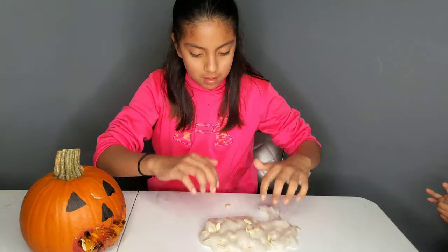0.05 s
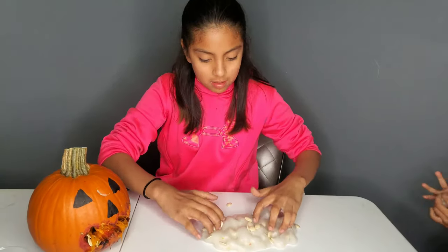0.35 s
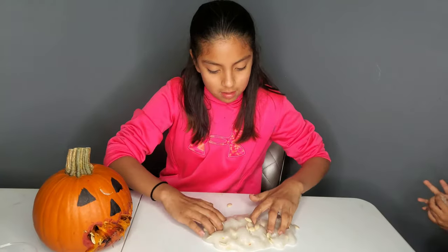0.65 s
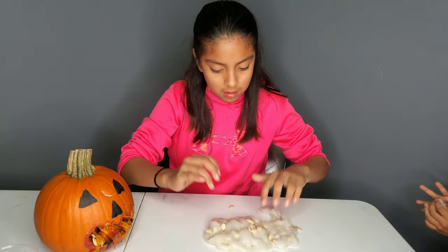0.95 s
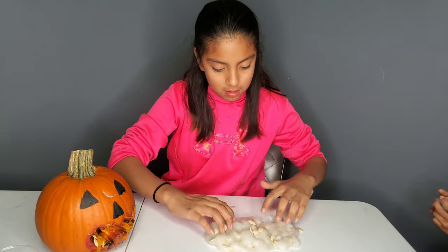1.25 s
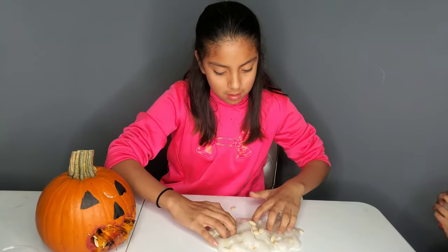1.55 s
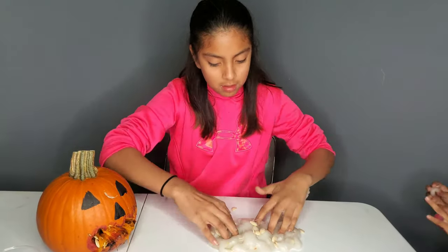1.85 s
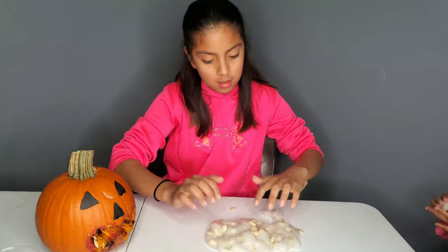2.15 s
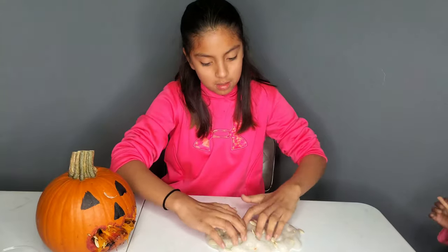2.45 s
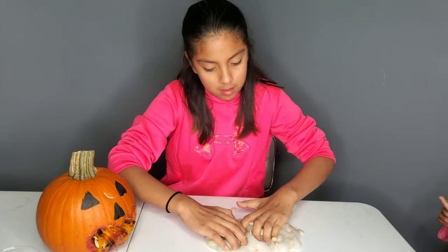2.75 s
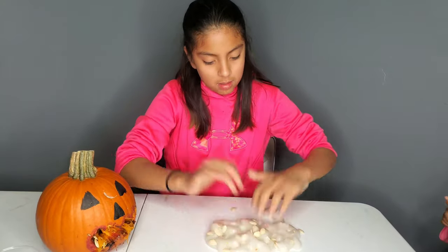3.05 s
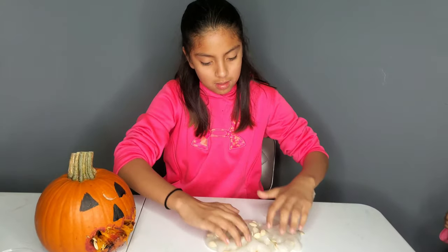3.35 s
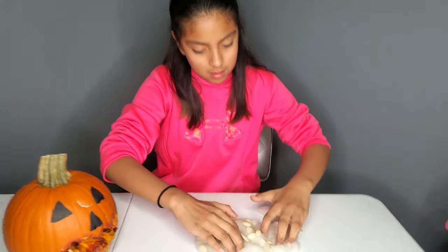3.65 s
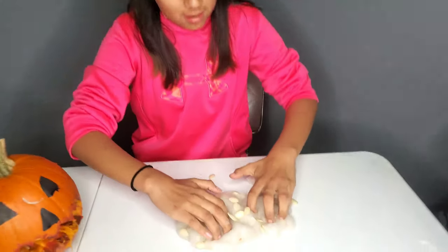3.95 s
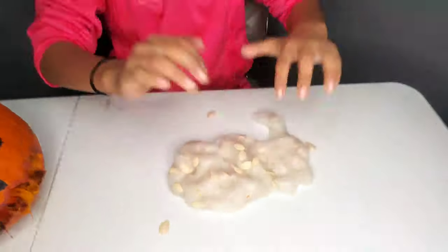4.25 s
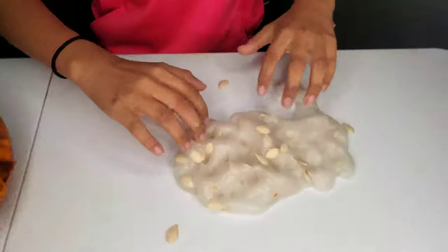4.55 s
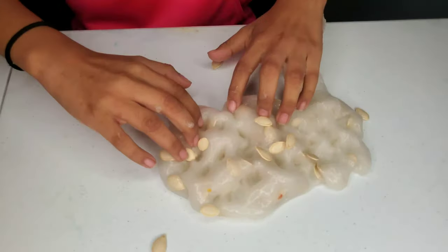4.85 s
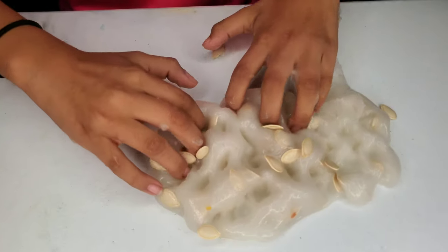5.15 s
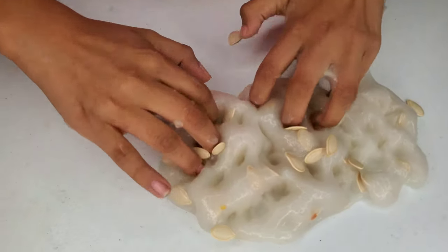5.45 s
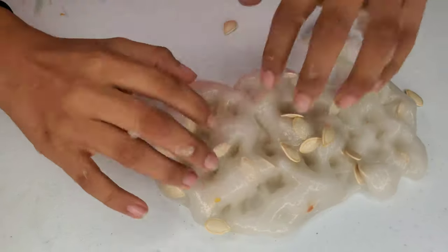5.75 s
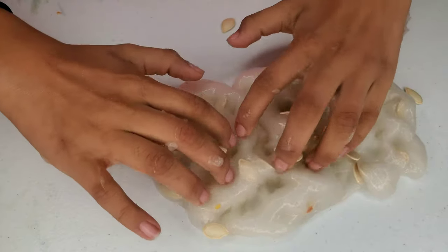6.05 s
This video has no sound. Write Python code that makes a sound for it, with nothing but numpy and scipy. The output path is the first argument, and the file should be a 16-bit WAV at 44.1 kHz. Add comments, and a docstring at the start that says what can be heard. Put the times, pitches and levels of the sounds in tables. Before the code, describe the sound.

Wet slime crackles and squelches in irregular bursts as fingers press it against a light table indoors. Small air bubbles snap, a couple of tiny squeaks slip out, and dull, hollow thumps come from the tabletop over a faint room hush. In the last third the microphone is nearer and everything is louder, with the hardest presses rattling a small piece of metal. A sharp pop comes just before the kneading dies away.

```python
"""Two hands knead sticky slime full of pumpkin seeds on a light folding table, in a small bare room.
Over the room's hush, resting fingers keep up a faint rumble and crackle. Trapped air pops, fingertips
sink through to the table, and the slime squelches and gulps as they peel out. Flat hands thump the top
and air squeaks twice through a pinhole. Late on the microphone leans in, drying the sound, and the
hardest presses set something small and metallic jingling; after a last loud pop the kneading fades."""
import sys
import numpy as np
from scipy import signal
from scipy.fft import rfft, irfft, next_fast_len
from scipy.io import wavfile

SR = 44100
rng = np.random.default_rng(int(sys.argv[2]) if len(sys.argv) > 2 else 0)


def dump(signal):
    """Clip the signal to [-1, 1] and save it as 16-bit WAV at the path in sys.argv[1]."""
    limited = np.clip(np.atleast_2d(signal).T, -1, 1)
    pcm = np.round(limited * 32767).astype(np.int16)
    wavfile.write(sys.argv[1], SR, pcm)


N = 272979

# Room air, kneading, pops, fingertip presses, squelches and thumps also have an overall level.
# spectrum of the still room air: (frequency [Hz], level [dB])
ROOM_TONE = [(25, -1), (60, 3), (130, -3.5), (260, -6), (420, -31.5), (800, -26), (1500, -24),
             (2600, -44.5), (10000, -40), (16000, -36)]
# quiet kneading between the big moves: (time [s], rumble level [dB], crackle level [dB])
KNEADING_BED = [(0.0, -70.5, -59.5), (0.26, -44, -59), (0.4, -41.5, -49), (1.02, -60.5, -53),
                (1.24, -63, -60), (1.52, -62, -72.5), (1.96, -36.5, -41.5), (2.26, -66, -72.5),
                (2.64, -64, -87), (2.93, -50, -62.5), (3.34, -69, -81.5), (3.84, -44, -65),
                (4.07, -41.5, -48.5), (4.36, -44.5, -45), (5.05, -46, -57.5), (5.46, -42, -56.5),
                (5.84, -49.5, -72), (6.19, -70, -79.5)]
# modes of the table top: (frequency [Hz], level [dB], t60 [s])
TABLE_MODES = [(70.2, -2.5, 0.34), (102.2, -1, 0.31), (156.3, -4.5, 0.23), (207.6, -3.5, 0.17),
               (270, -4.5, 0.27), (316.2, -8.5, 0.26), (377, -7, 0.21), (466.5, 2, 0.048),
               (527.4, -10.5, 0.2), (572, -17.5, 0.25), (642.5, -16, 0.25), (833, -6.5, 0.069),
               (950, -14.5, 0.22), (1180, -15.5, 0.14)]
# single air pockets bursting: (time [s], level [dB], brightness [dB])
AIR_POPS = [(0.1084, -50, 11), (0.2231, -58, 13.5), (0.5782, -40, -7), (0.749, -52, -1), (0.788, -40, -5.5),
            (0.8708, -53, -7), (0.8994, -36.5, -3.5), (0.9274, -35, -2), (1.5032, -64, 19.5),
            (1.6495, -51, 0.5), (1.7134, -40, -5), (1.767, -40.5, -7), (1.9248, -39, -4), (1.9576, -41, 10),
            (1.9802, -29, -0.5), (2.8408, -50.5, -6), (2.9391, -43.5, -2.5), (3.0098, -32.5, -1.5),
            (3.0226, -21, -0.5), (3.8435, -41.5, -8), (3.9215, -37, -7), (4.1772, -43.5, 11),
            (4.181, -26, 1), (4.2001, -24, -4.5), (4.065, -37, 0), (4.383, -36.5, -1), (4.7806, -45, -13),
            (5.1, -50.5, 5), (5.1626, -45, 3), (5.192, -38.5, -6), (5.288, -35.5, -12.5), (5.3497, -32, 2),
            (5.4176, -55, 10), (5.522, -44.5, 6.5), (5.5284, -39, 2), (5.572, -30, 7), (5.5783, -29.5, 1.5),
            (5.5813, -16.5, 3.5), (5.5916, -30, -2)]
# edges of the slime's three bands: (bottom [Hz], low split [Hz], high split [Hz], top [Hz])
SLIME_EDGES = [600, 1900, 4400, 15000]
# EQ of an ordinary pop in those bands: (low [dB], middle [dB], high [dB])
POP_EQ = [0, -7.5, 0]
# fingertips sinking through the slime onto the table: (time [s], hollow note [Hz], level [dB])
FINGERTIP_PRESSES = [(0.226, 211, -39.5), (0.369, 179, -30), (0.465, 224, -34), (0.488, 197, -32),
                     (0.62, 183, -41), (1.04, 238, -34.5), (1.768, 207, -42), (1.961, 200, -37.5),
                     (2.03, 294, -42), (2.731, 188, -42.5), (2.8397, 311, -43), (3.326, 301, -41),
                     (3.368, 190, -37.5), (3.512, 185, -46), (4.227, 184, -29), (4.333, 372, -32.5),
                     (4.385, 232, -33), (4.811, 227, -23), (4.861, 262, -29.5), (5.19, 310, -28)]
# edges of the table's three bands: (bottom [Hz], low split [Hz], high split [Hz], top [Hz])
TABLE_EDGES = [30, 130, 380, 1200]
# EQ of a fingertip in those bands: (push [dB], body [dB], knock [dB])
DIMPLE_EQ = [-12.5, 0, -12]
# fingers sinking in or peeling off: (time [s], length [s], level [dB], brightness [dB])
FINGER_STROKES = [(0.231, 0.065, -53, -8.5), (0.455, .04, -50, -1), (0.577, 0.072, -45.5, 0),
                  (0.783, 0.055, -55.5, -1), (0.905, 0.083, -39, -3.5), (1.092, 0.034, -50.5, -1.5),
                  (1.67, 0.063, -52, 0), (1.942, 0.033, -45, -8.5), (2.085, 0.054, -48.5, 4),
                  (2.633, 0.047, -63.5, 3), (2.714, 0.042, -52.5, 1), (2.943, 0.057, -54, -5),
                  (3.005, 0.031, -32.5, 5.5), (3.59, 0.034, -66, 1.5), (3.89, 0.098, -49, 3.5),
                  (4.063, 0.054, -37.5, -1), (4.175, .033, -34, -3.5), (4.372, 0.055, -36, -0.5),
                  (4.527, 0.039, -31, -6.5), (4.783, .023, -37.5, -10.5), (5.169, 0.1, -50, -0.5),
                  (5.287, 0.061, -48, -6.5), (5.521, 0.052, -41, -3.5), (5.585, 0.0074, -25.5, -3)]
# EQ of an ordinary squelch in the slime's bands: (low [dB], middle [dB], high [dB])
SQUELCH_EQ = [0, 1, 0]
# hollows gulping open as fingers pull out: (time [s], pitch [Hz], level [dB])
OPENING_HOLLOWS = [(.579, 764, -29), (.926, 2944, -27.5), (.949, 1258, -22.5), (1.957, 1343, -22.5),
                   (1.958, 2642, -21.5), (3.024, 1063, -21), (4.199, 1185, -26), (4.383, 3120, -19.5),
                   (4.779, 3200, -24.5), (5.286, 2993, -23.5), (5.349, 1064, -20.5), (5.592, 999, -12.5)]
# flat hands landing on the table: (time [s], level [dB], hardness [dB])
HAND_LANDINGS = [(0.79, -45, -2), (0.865, -43, -2.5), (0.93, -34, 0), (0.97, -40, 4), (2.976, -45, 1.5),
                 (3.029, -32, 2.5), (3.778, -43, -4.5), (3.845, -37.5, 7.5), (4.132, -39, -0.5),
                 (4.186, -29, -4), (4.272, -24.5, 4.5), (4.299, -28.5, 4.5), (4.53, -16.5, 2),
                 (4.601, -29, -2), (5.286, -16.5, -1), (5.32, -26, -5.5), (5.353, -31, -1.5),
                 (5.496, -36, -4.5), (5.563, -32.5, -6), (5.611, -28.5, -10)]
# EQ of an ordinary thump in the table's bands: (push [dB], body [dB], knock [dB])
THUMP_EQ = [-4.5, 0, -4]
# air squeaking out through a pinhole: (time [s], length [s], level [dB])
AIR_JETS = [(0.896, 0.027, -47), (1.782, 0.083, -51)]
# resonances of the pinhole: (frequency [Hz], width [Hz], level [dB])
PINHOLE_PEAKS = [(6340, 100, -0.5), (8190, 66, 6), (8970, 210, -14.5), (9440, 260, 0), (9400, 360, -18)]
# loose metal chattering: (time [s], length [s], level [dB])
METAL_RATTLES = [(4.537, 0.054, -35), (4.868, 0.018, -51), (5.317, 0.078, -57)]
# modes of the loose metal: (frequency [Hz], level [dB], nominal t60 [s])
METAL_MODES = [(3770, -10, 0.2), (4800, 6, 0.17), (4786, -16.5, .3), (5540, -18, .24), (5680, -1.5, 0.4),
               (7230, -3, .2), (8170, -8, .2), (8840, 2.5, 0.059), (9500, 2.5, 0.21), (10700, -7.5, 0.21),
               (12500, 0, .2), (13830, -9.5, 0.24)]
# trim on the metal's ring, a touch shorter up high: (frequency [Hz], t60 scale [ratio])
METAL_DECAY_TRIM = [(4500, 0.97), (11000, .95)]
# decay of the room: (frequency [Hz], t60 [s])
ROOM_DECAY = [(100, 0.27), (500, 0.38), (1400, 0.28), (4000, 0.27), (9000, 0.21), (15000, 0.2)]
# the microphone leans in over the table: (time [s], reverb send offset [dB])
LEAN_IN = [(3.7, 2.5), (5, -4)]
# colour of the microphone: (frequency [Hz], gain [dB])
MIC_EQ = [(25, 3), (60, 4), (1100, -2.5), (1900, -4), (3500, -0.5), (7000, -0.5), (10000, -0.5),
          (12500, -6.5), (15000, -9)]


def amp(db):
    """Decibels to gain."""
    return 10 ** (np.asarray(db) / 20)


def rms(x):
    """Average signal level, as root mean square."""
    return np.sqrt(np.mean(x ** 2) + 1e-20)


def along(points, hz):
    """Read a (frequency, value) curve on a log frequency axis."""
    freqs, values = np.transpose(points)
    return np.interp(np.log(hz + 1), np.log(freqs), values)


def clock():
    """Time axis of one event, half a second long."""
    return np.arange(SR // 2) / SR


def add(track, s, sound):
    """Mix a sound into the track at time s."""
    part = track[max(round(s * SR), 0):][:len(sound)]
    part += sound[:len(part)]


def filtered(x, response):
    """Shape a sound with a gain curve over frequency."""
    size = next_fast_len(len(x) + SR // 4)
    return irfft(rfft(x, size) * response(np.fft.rfftfreq(size, 1 / SR)), size)[:len(x)]


def band(x, lo, hi, order=3):
    """Band-pass from lo to hi, in Hz."""
    sections = signal.butter(order, [lo, min(hi, SR / 2 - 100)], 'band', fs=SR, output='sos')
    return signal.sosfilt(sections, x)


def toned(x, edges, levels_db, window_s, order=3):
    """Multiband EQ: each band is set to its level over the opening window."""
    parts = [band(x, lo, hi, order=order) for lo, hi in zip(edges, edges[1:])]
    return sum(amp(db) * part / rms(part[:int(window_s * SR)]) for part, db in zip(parts, levels_db))


def tilted(eq, level_db, slope_db):
    """Three-band tilt: a bright or hard event lifts the top and lowers the bottom alike."""
    return level_db + np.array(eq) + slope_db * np.array([-1, 0, 1])


def in_room(x, wet_db):
    """The direct sound, slaps off a few near walls, then a diffuse tail."""
    hz, t, spectrum = signal.stft(rng.standard_normal(SR // 2), SR, nperseg=256)
    decay = amp(-60 * t / along(ROOM_DECAY, hz)[:, None])
    tail = signal.istft(spectrum * decay, SR, nperseg=256)[1][:SR // 2]
    tail *= np.clip((clock() - .002) / .006, 0, 1)
    slaps = (rng.uniform(.003, .025, 7) * SR).astype(int)
    tail[slaps] += 3.55 * rng.standard_normal(7)
    impulse = amp(wet_db) * tail / np.linalg.norm(tail)
    impulse[0] += 1  # direct sound
    return signal.fftconvolve(x, impulse)[:len(x)]


def room_share(s):
    """Reverb send offset in dB: the nearer the microphone, the less room it hears."""
    return np.interp(s, *np.transpose(LEAN_IN))


def air(level_db):
    """The low hush of still air in the room."""
    hush = filtered(rng.standard_normal(N), lambda hz: amp(along(ROOM_TONE, hz)))
    return amp(level_db) * hush / rms(hush)


def bubbles(times, sizes, samples, pitch_hz, spread, cycles):
    """Tiny cavities tear open; the slime damps each within about one cycle."""
    t = np.arange(SR // 300) / SR
    hz = np.clip(pitch_hz * np.exp(spread * rng.standard_normal((len(times), 1))), 600, 14000)
    turns = hz * t
    grains = np.sin(2 * np.pi * turns) * np.exp(-turns / cycles) * (hz / pitch_hz) ** .5
    grains *= rng.choice([-1, 1], (len(times), 1))
    positions = (times * SR).astype(int)[:, None] + np.arange(len(t))
    return np.bincount(positions.ravel(), (sizes[:, None] * grains).ravel(), samples)[:samples]


def kneading(rumble_db, crackle_db, bubbles_per_s, size_spread_db):
    """Resting fingers keep the table rumbling and the slime rustling faintly."""
    cues, *faders = np.transpose(KNEADING_BED)
    rumble_fader, crackle_fader = [np.interp(np.arange(N) / SR, cues, fader) for fader in faders]
    table_top = ring(TABLE_MODES, scatter_db=0)
    rumble = band(signal.fftconvolve(rng.standard_normal(N), table_top)[:N], 150, 740, order=2)
    count = int(bubbles_per_s * N / SR)
    sizes = amp(size_spread_db * np.minimum(rng.exponential(size=count), 3))
    times = rng.uniform(0, N / SR, count)
    crackle = bubbles(times, sizes, N, pitch_hz=4455, spread=1.0, cycles=0.47)
    crackle = band(in_room(crackle, wet_db=-4.0), 520, 8100)
    return (amp(rumble_fader + rumble_db) * rumble / rms(rumble)
            + amp(crackle_fader + crackle_db) * crackle / rms(crackle))


def ring(modes, scatter_db):
    """One blow on a set of modes; random scatter in their strengths stands for where it lands."""
    t = clock()
    return sum(rng.choice([-1, 1]) * amp(db + scatter_db * rng.normal() - 60 * t / t60)
               * np.sin(2 * np.pi * hz * t) for hz, db, t60 in modes)


def pops(level_db, wet_db, tear_s, crack_db):
    """A film of slime cracks at once, then tears open over an air pocket."""
    out, t = np.zeros(N), clock()
    for s, db, brightness in AIR_POPS:
        crack = amp(crack_db) * np.exp(-t / 0.00019)
        tear = np.exp(-t / tear_s) * (1 - np.exp(-t / 0.00095))
        snap = rng.standard_normal(len(t)) * (crack + tear)
        pocket = np.sin(2 * np.pi * rng.uniform(885, 1400) * t) * np.exp(-t / 0.0015)
        levels = tilted(POP_EQ, db, brightness)
        pop = toned(snap + 0.23 * pocket, SLIME_EDGES, levels, window_s=0.0037, order=5)
        add(out, s, in_room(pop, wet_db + room_share(s)))
    return amp(level_db) * out


def dimples(level_db, wet_db, note_gain, note_t60, rise_s):
    """A fingertip sounds one round, hollow note over the table's modes; each spot has its own note."""
    out, t = np.zeros(N), clock()
    for s, note_hz, db in FINGERTIP_PRESSES:
        note = np.sin(2 * np.pi * note_hz * t) * amp(-60 * t / note_t60) * (1 - np.exp(-t / rise_s))
        blow = table_blow(push=9.9, pat_s=0.018) + note_gain * note
        add(out, s, landing(s, blow, db + np.array(DIMPLE_EQ), wet_db))
    return amp(level_db) * out


def table_blow(push, pat_s, contact_s=.003, pat_db=22.5):
    """A soft hand shoves the table top, pats it with skin and sets its modes ringing."""
    t = clock()
    shove = push * (1 - t / contact_s) * np.exp(-t / contact_s)
    pat = band(rng.standard_normal(len(t)), 77, 900, order=2) * np.exp(-t / pat_s)
    return ring(TABLE_MODES, scatter_db=2.5) + shove + amp(pat_db) * pat


def landing(s, blow, levels, wet_db):
    """A thud in the room, layered with the squish of slime under it, whose level rides the knock."""
    thud = in_room(toned(blow, TABLE_EDGES, levels, window_s=0.029), wet_db + room_share(s))
    knock_db = levels[-1]
    squish = stroke(length_s=.04, db=knock_db - 21.5, brightness=-2, wet_db=room_share(s))
    return thud + squish


def stroke(length_s, db, brightness, wet_db, tears_per_s=650, size_spread_db=5,
           strand_delay_s=.06, strand_db=-9.5):
    """A moving finger tears a swell of tiny bubbles; thin strands snap after it, ever smaller."""
    count = int(tears_per_s * length_s) + 4
    progress = (np.arange(count) + rng.random(count)) / count
    swell = .5 + np.sin(np.pi * progress)
    tears = amp(size_spread_db * np.minimum(rng.exponential(size=count), 3)) * swell
    lateness = rng.exponential(size=count)
    strands = tears * amp(strand_db) * np.exp(-lateness)
    times = np.r_[progress * length_s, length_s + strand_delay_s * lateness]
    crackle = bubbles(times, np.r_[tears, strands], SR // 2, pitch_hz=3100, spread=0.76, cycles=0.73)
    levels = tilted(SQUELCH_EQ, db, brightness)
    return toned(in_room(crackle, wet_db), SLIME_EDGES, levels, window_s=length_s + 0.0031)


def squelches(level_db, wet_db):
    """One sticky stroke each time the fingers sink in or peel off."""
    out = np.zeros(N)
    for s, length_s, db, brightness in FINGER_STROKES:
        add(out, s, stroke(length_s, db, brightness, wet_db + room_share(s)))
    return amp(level_db) * out


def gulps(wet_db, decay_s, glide, flutter):
    """A finger-sized hollow rings; its pitch rises as the mouth widens and its soft rim flutters."""
    out, t = np.zeros(N), clock()
    for s, hz, db in OPENING_HOLLOWS:
        rim = band(rng.standard_normal(len(t)), 66, 400, order=1)
        pitch = hz * (1 + glide * (np.tanh(t / decay_s) - .5) + flutter * rim / rms(rim))
        envelope = np.exp(-t / decay_s) * (1 - np.exp(-t / 0.0004))
        tone = np.sin(2 * np.pi * np.cumsum(pitch) / SR) * envelope
        add(out, s, in_room(amp(db) * tone, wet_db + room_share(s)))
    return out


def thumps(level_db, wet_db, shove_per_softness):
    """A flat hand moves the whole top; a hard landing knocks more, a soft one shoves more."""
    out = np.zeros(N)
    for s, db, hardness in HAND_LANDINGS:
        blow = table_blow(push=8 * amp(-shove_per_softness * hardness), pat_s=0.02)
        add(out, s, landing(s, blow, tilted(THUMP_EQ, db, hardness), wet_db))
    return amp(level_db) * out


def squeaks(wet_db):
    """A thin jet of air whistles in a narrow opening."""
    def pinhole(hz):
        return sum(amp(db) * 1j * hz * width / (centre ** 2 - hz ** 2 + 1j * hz * width)
                   for centre, width, db in PINHOLE_PEAKS)

    out, t = np.zeros(N), clock()
    for s, length_s, db in AIR_JETS:
        jet = band(filtered(rng.standard_normal(len(t)), pinhole), 5200, 14000)
        flow = np.clip(np.minimum(t, length_s - t) / 0.0071, 0, 1)
        add(out, s, in_room(amp(db) * flow * jet / rms(jet), wet_db))
    return out


def jingles(wet_db, clatter, detune):
    """Six alike metal pieces bounce in turn, each ticking and ringing at a slightly different pitch."""
    out, t = np.zeros(N), clock()
    for s, length_s, db in METAL_RATTLES:
        rattle = np.zeros(len(t))
        for delay in np.linspace(0, length_s, 6) * rng.uniform(.8, 0.87, 6):
            hz, mode_db, t60 = np.transpose(METAL_MODES)
            hz = hz * (1 + detune * rng.uniform(-1.1, 1))
            piece = zip(hz, mode_db, t60 * along(METAL_DECAY_TRIM, hz))
            tick = band(rng.standard_normal(len(t)), 3000, 13000) * np.exp(-t / 0.0073)
            add(rattle, delay, ring(piece, scatter_db=0) + clatter * tick)
        jingle = in_room(rattle, wet_db)
        add(out, s, amp(db) * jingle / rms(jingle[:int(length_s * SR)]))
    return out


def scene():
    """Slime, table and metal over a quiet bed, mixed to mono."""
    slime = pops(level_db=-1.0, wet_db=-1, tear_s=0.002, crack_db=6)
    slime += squelches(level_db=-3.5, wet_db=-0.5)
    slime += gulps(wet_db=-5, decay_s=.007, glide=.12, flutter=0.16)
    slime += squeaks(wet_db=7.5)
    table = thumps(level_db=-2.0, wet_db=-4, shove_per_softness=1.1)
    table += dimples(level_db=-2, wet_db=-4.5, note_gain=13, note_t60=0.066, rise_s=0.0059)
    metal = jingles(wet_db=0.5, clatter=4.5, detune=.03)
    bed = kneading(rumble_db=-3.5, crackle_db=-4.5, bubbles_per_s=2700, size_spread_db=4)
    bed += air(level_db=-56.5)
    return (slime + table + metal + bed)[None]


def record(dry):
    """A small microphone with a soft top, then a steep high cut."""
    cutoff_hz = 15700
    coloured = filtered(dry[0], lambda hz: amp(along(MIC_EQ, hz)))
    return filtered(coloured, lambda hz: 1 / np.sqrt(1 + (hz / cutoff_hz) ** 160))[None]


dry = scene()
out = record(dry)
dump(out)
```